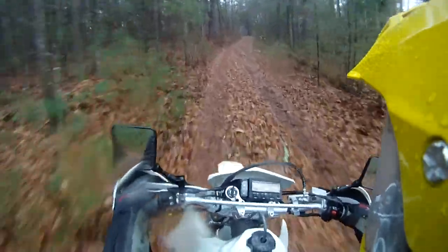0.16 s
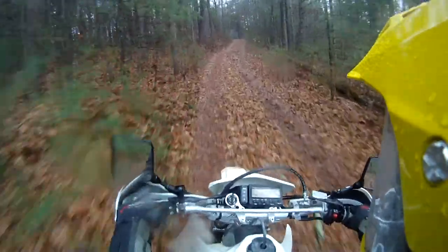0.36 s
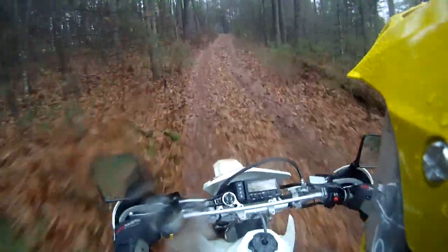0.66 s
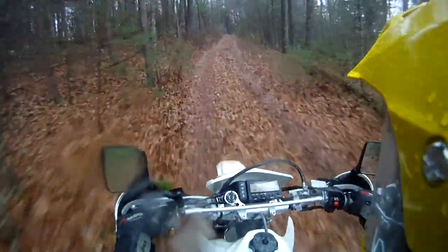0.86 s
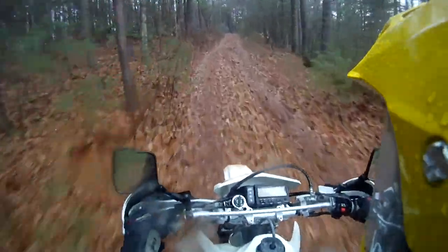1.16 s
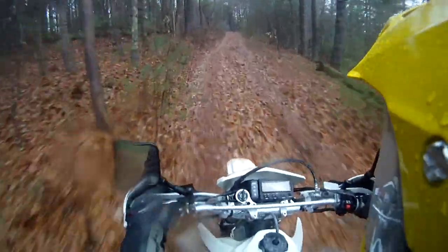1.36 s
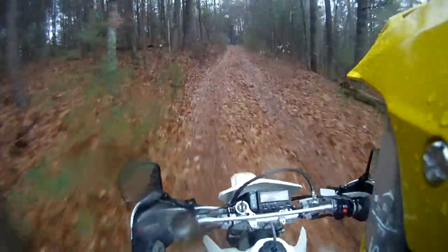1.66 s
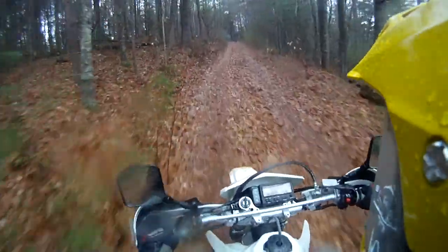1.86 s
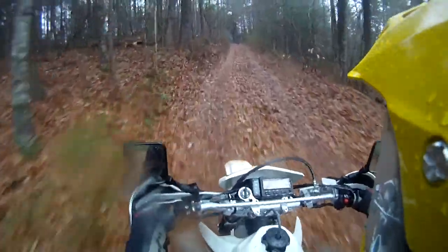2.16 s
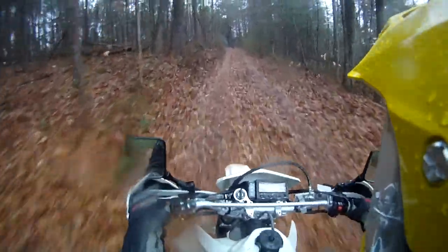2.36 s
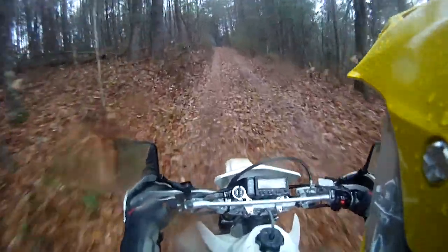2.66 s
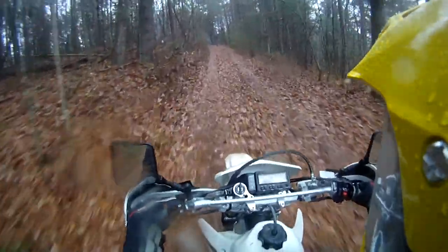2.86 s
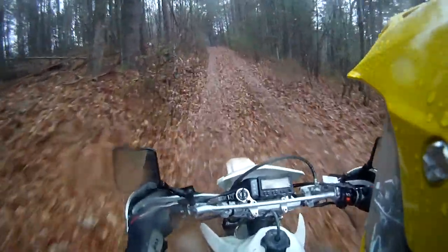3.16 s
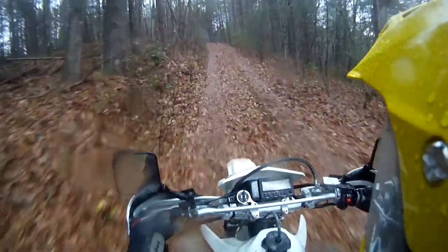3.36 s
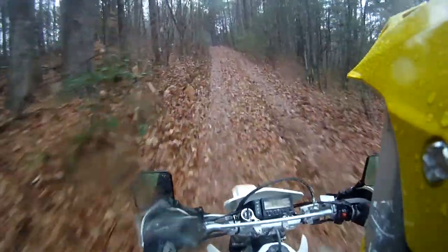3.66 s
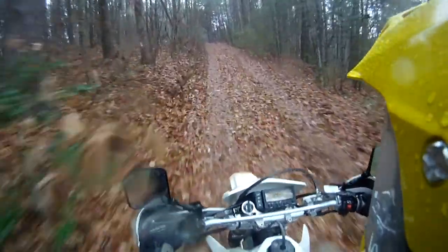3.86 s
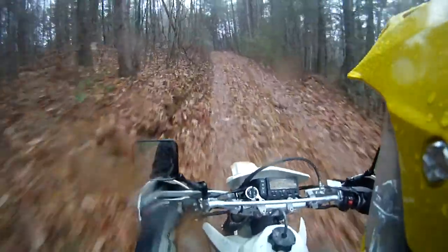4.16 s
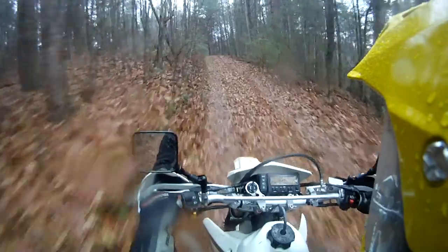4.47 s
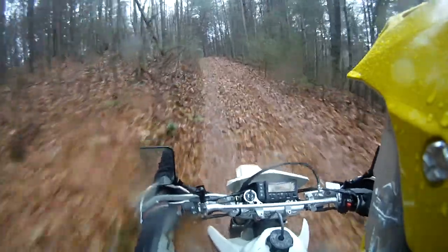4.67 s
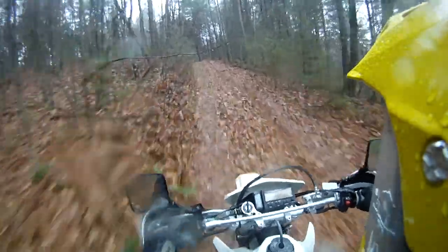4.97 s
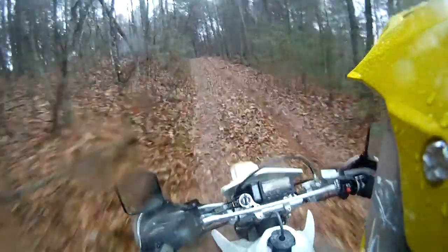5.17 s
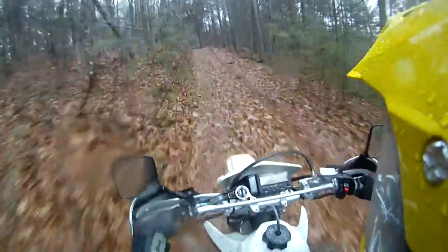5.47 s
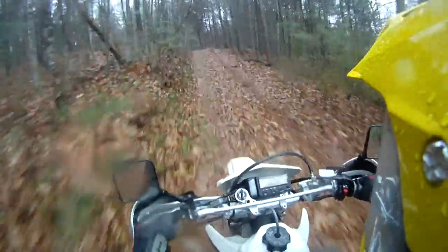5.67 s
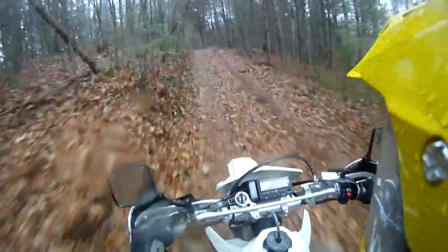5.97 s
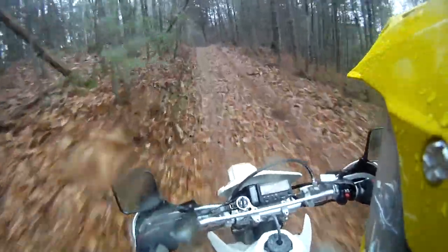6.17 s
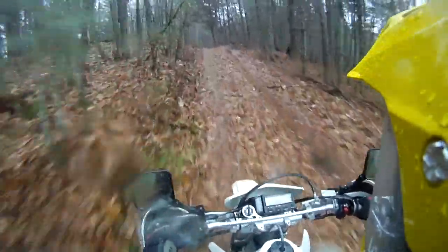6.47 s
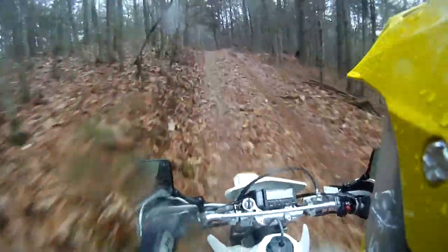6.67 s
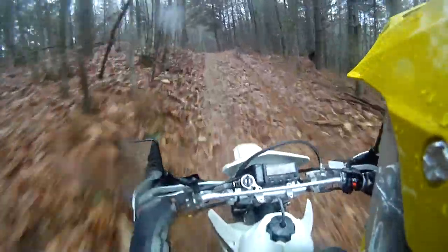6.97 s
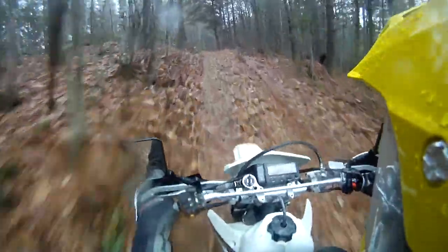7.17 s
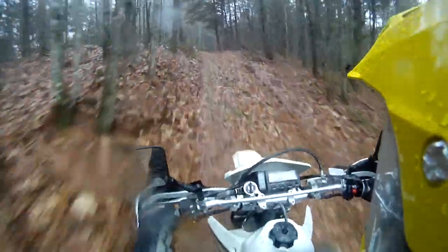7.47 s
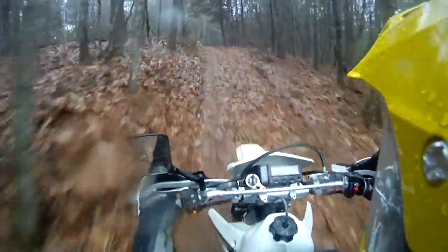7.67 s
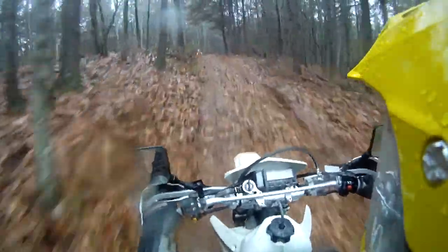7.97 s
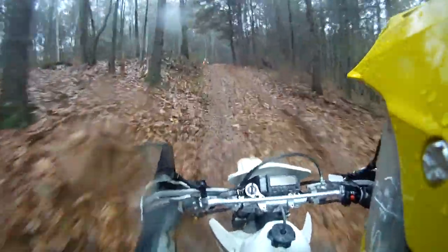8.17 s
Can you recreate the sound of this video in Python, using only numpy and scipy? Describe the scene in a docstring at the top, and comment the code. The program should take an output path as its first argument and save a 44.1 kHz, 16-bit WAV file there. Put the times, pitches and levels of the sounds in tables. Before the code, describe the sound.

Helmet-level ride on a thumping off-road motorcycle, muffled and rattly, wet tyre hiss beneath, small sharp ticks, then a hard distorted crack before pulling again.

```python
"""A single-cylinder dirt bike on a wet forest track, heard from a cased camera on the rider's helmet.
From the start: filtered firing pulses give exhaust thud and bark plus intake growl; shaped noise gives
engine clatter, a case buzz once a cycle and wet tyre hiss, all over a wobbling low helmet boom.
The engine pulls, shifts up near 1.7 s, cruises, shifts down near 3.8 s, while drops and grit tick on the case.
Easing off, it meets hard knocks near 5.2 s (struck modes) that clip and duck the sound, then pulls again."""
import sys
import numpy as np
from scipy import signal
from scipy.fft import rfft, irfft
from scipy.io import wavfile

SR = 44100
rng = np.random.default_rng(int(sys.argv[2]) if len(sys.argv) > 2 else 0)


def digitize_waveform(pressure):
    """Quantize a signal to 16-bit integers and store it at the path in sys.argv[1].

    Rows of a 2-D input are taken as channels; values are limited to [-1, 1].
    """
    field = np.atleast_2d(pressure).T
    bounded = np.clip(field, -1, 1)
    quanta = np.round(bounded * 32767).astype(np.int16)
    wavfile.write(sys.argv[1], SR, quanta)


N = 366912
T = np.arange(N) / SR


def amp(db):
    """Decibels to gain."""
    return 10 ** (np.asarray(db) / 20)


def evened(x):
    """Scales to rms 1."""
    return x / np.sqrt(np.mean(x ** 2) + 1e-20)


def peaked(x):
    """Scales to peak 1."""
    return x / abs(x).max()


def curve(rows):
    """Table columns, joined by straight lines in time."""
    t_s, *columns = np.transpose(rows)
    return [np.interp(T, t_s, column) for column in columns]


def add(mix, t_s, sound):
    """Mixes a sound in at a time, cut at the end of the mix."""
    part = mix[round(t_s * SR):][:len(sound)]
    part += sound[:len(part)]


def wander(hz):
    """Random points at a given rate, joined by lines, rms 1."""
    points = rng.standard_normal(N // 40)
    return evened(np.interp(T * hz, np.arange(N // 40), points))


def colour(x, points, peaks=(), size=8192):
    """Minimum-phase (causal) filter from a spectrum with resonances on top."""
    bin_hz = np.fft.rfftfreq(size, 1 / SR)
    f_hz, point_db = np.transpose(points)
    gain_db = np.interp(np.log(bin_hz + 1), np.log(f_hz), point_db)
    for centre_hz, width_hz, rise_db in peaks:
        gain_db = gain_db + rise_db / (1 + (2 * (bin_hz - centre_hz) / width_hz) ** 2)
    # folding the cepstrum onto positive time gives minimum phase
    cepstrum = irfft(np.log(amp(gain_db)))
    cepstrum[1:size // 2] *= 2
    cepstrum[size // 2 + 1:] = 0
    impulse = irfft(np.exp(rfft(cepstrum)))
    return signal.oaconvolve(x, impulse)[:len(x)]


# case transmission: f/Hz, level/dB
CASE_SPECTRUM = [(300, -9.5), (3600, 6), (4050, 0), (4800, 6), (5350, 4), (6000, -14), (6800, 4.5),
                 (7900, -4), (9600, -1.5), (11000, -6.5), (11500, -22.5), (12500, -32), (13300, -6.5),
                 (15400, -6.5)]
# narrow case resonances: f/Hz, width/Hz, rise/dB
CASE_RESONANCES = [(1210, 180, 4), (2330, 180, 4), (3650, 150, 3), (8350, 180, 6), (9670, 200, 8),
                   (10790, 170, 12), (13210, 160, 15), (14320, 220, 9)]


def through_case(x):
    """The case passes some bands, blocks others and resonates."""
    return colour(x, CASE_SPECTRUM, CASE_RESONANCES)


def cased(x, points):
    """A source spectrum heard through the case, rms 1."""
    return evened(through_case(colour(x, points)))


def gate(turns, at, width):
    """Gaussian bump at one point of every engine cycle; at and width in cycles."""
    return np.exp(-.5 * (((turns - at + .5) % 1 - .5) / width) ** 2)


def grains(per_s, spread_db):
    """Random tiny impacts of either sign, a few of them large, rms 1."""
    size = amp(spread_db * np.minimum(rng.exponential(1, N), 4))
    sign = rng.choice([-1, 1], N)
    return evened(size * sign * (rng.random(N) < per_s / SR))


# engine speed over pulls and gear shifts: t/s, firings/Hz
ENGINE_SPEED = [(0.0, 30.26), (0.15, 30.9), (0.7, 33.29), (0.87, 33.02), (1.5, 35.74), (1.64, 30.22),
                (1.87, 24.43), (2.15, 24.86), (2.75, 26.1), (3.0, 25.83), (3.68, 26.73), (3.88, 30.45),
                (4.15, 30.96), (4.38, 30.75), (4.53, 29.21), (4.88, 27.35), (5.13, 27.21), (6.0, 25.48),
                (6.38, 24.51), (6.5, 26.59), (6.9, 29.74), (7.2, 28.46), (7.65, 29.75), (8.32, 29.91)]


def firing_hz():
    """One firing per engine cycle."""
    return curve(ENGINE_SPEED)[0]


# unevenness 0-1 at steady speed; rate of speed change that alone gives full unevenness
STEADY_RAGGED, UPSET_HZ_PER_S = 0.026, 32


def ragged():
    """Firings turn uneven (0-1) while the engine speed changes fast."""
    change_hz_per_s = abs(np.gradient(firing_hz())) * SR
    return np.minimum(STEADY_RAGGED + (change_hz_per_s / UPSET_HZ_PER_S) ** 2, 1)


def strokes(turns, at, jitter_s):
    """One pulse a cycle; ragged running upsets its size and moment."""
    spread_db = 2.5  # std dev at full raggedness, as is jitter_s
    index = np.flatnonzero(np.diff(np.floor(turns - at)))
    late, size = rng.standard_normal((len(index), 2)).T * ragged()[index]
    place = index + (late * jitter_s * SR).astype(int)
    pulses = np.zeros(N)
    pulses[np.clip(place, 0, N - 1)] = amp(spread_db * size)
    return pulses


# exhaust thud spectrum: f/Hz, level/dB
THUD_SPECTRUM = [(30, -48), (65, -11.5), (100, 10.5), (132, 12.5), (165, -19), (220, -13), (500, -65)]
# pipe standing waves: f/Hz, width/Hz, rise/dB
PIPE_RESONANCES = [(99, 45, 7), (226, 30, 4), (277, 79, 8.5)]
# exhaust bark spectrum: f/Hz, level/dB
BARK_SPECTRUM = [(90, -34), (165, -21), (200, 8), (238, -1), (290, 8), (335, 7.5), (400, -3), (455, 3),
                 (540, -6), (700, -18.5), (1000, -19), (1500, -48)]
BARK_DB = -46  # rms at full throttle


def exhaust(turns, throttle, thud_db):
    """Blow-down pulses thud in the pipe and bark in proportion to throttle."""
    blow = strokes(turns, at=.94, jitter_s=0.002)
    thud = amp(thud_db - 3.0) * evened(colour(blow, THUD_SPECTRUM, PIPE_RESONANCES))
    bark = amp(BARK_DB) * throttle * evened(colour(blow, BARK_SPECTRUM))
    return thud + bark


# intake growl spectrum: f/Hz, level/dB
INTAKE_SPECTRUM = [(150, -30), (198, -2.5), (240, 4), (272, 7), (310, -5), (360, -17.5), (450, -9),
                   (540, -21), (700, -26), (1500, -55)]
# open-throttle rms before the throb; drop at shut throttle; throttle step that cuts the drop by 1/e
GROWL_DB, SHUT_DROP_DB, BITE = -48, 6, .15
# throb period in engine cycles; peak place 0-1; depth at shut throttle
THROB_CYCLES, THROB_PEAK, THROB_DB = 7.365, .15, 4


def airbox(turns, throttle):
    """Intake pulses growl near half a cycle from the exhaust, fade as throttle shuts and throb at light load."""
    suck = strokes(turns, at=.49, jitter_s=.002)
    throb = np.cos(2 * np.pi * (turns / THROB_CYCLES - THROB_PEAK))
    throb_db = THROB_DB * (1 - throttle) * throb
    level_db = GROWL_DB - SHUT_DROP_DB * np.exp(-throttle / BITE) + throb_db
    return amp(level_db) * evened(colour(suck, INTAKE_SPECTRUM, [(275, 40, 2.4)]))


# engine clatter spectrum: f/Hz, level/dB
CLATTER_SPECTRUM = [(150, -25.5), (400, -22), (550, -4.5), (800, -6.5), (890, -11), (1000, 0), (1230, -1),
                    (1400, -11), (1650, -16), (2100, -12), (2450, -14.5), (3000, -28), (6000, -29),
                    (15000, -20)]


def clatter(turns, level_db):
    """Piston, chain and gears tap the crankcase, harder as the valves shut."""
    load = 1 + 0.77 * gate(turns, at=0.33, width=0.09) + 0.27 * gate(turns, at=0.83, width=0.047)
    taps = grains(per_s=5000, spread_db=1.5) * load * amp(1.0 * wander(hz=25.13))
    return amp(level_db + 1.0) * cased(taps, CLATTER_SPECTRUM)


# case buzz spectrum: f/Hz, level/dB
BUZZ_SPECTRUM = [(400, -6), (900, -18), (1220, 4.5), (1500, -21.5), (1850, -5), (2100, -3), (2200, -15),
                 (2340, 2), (2800, -15), (4500, -19), (8300, -21), (9700, -11.5), (11500, -26.5),
                 (14400, -12)]


def buzz(turns, level_db, rise_s=0.0015, hold_s=0.0056, decay_s=.0045):
    """The case bumps its mount at the peak of every shake and chatters briefly."""
    since_s = (turns - .255) % 1 / firing_hz()
    burst = (1 - np.exp(-since_s / rise_s)) * np.exp(-np.maximum(since_s - hold_s, 0) / decay_s)
    chatter = rng.standard_normal(N) * burst * amp(.6 * wander(hz=22))
    return amp(level_db + 1.5) * cased(chatter, BUZZ_SPECTRUM)


# tyre hiss spectrum: f/Hz, level/dB
HISS_SPECTRUM = [(200, -6), (700, 7.5), (1500, 3.5), (2600, -1), (3500, -5.5), (5000, -5), (9000, -6),
                 (15000, -17.5)]


def tyres(turns, level_db):
    """Wet leaves and spray crackle under the tyres; the valves add a thin tick."""
    spray = grains(per_s=6000, spread_db=3.0) * amp(0.58 * wander(hz=30.44))
    valves = 0.8 * rng.standard_normal(N) * gate(turns, at=0.682, width=0.02)
    return amp(level_db + 2.5) * cased(spray + valves, HISS_SPECTRUM)


# buffeting air spectrum: f/Hz, level/dB
WIND_SPECTRUM = [(10, -24.5), (25, 1), (48, -4.5), (80, -9.5), (150, -15), (280, -15), (420, -22),
                 (1000, -41)]
# bumps and gusts that swell the boom: t/s, length/s, level/dB
BOOM_JOLTS = [(0.0, 0.04, -29.5), (0.41, 0.065, -40), (0.68, .13, -43), (0.987, 0.084, -34),
              (1.422, .1, -35.5), (2.55, 0.42, -34.5), (3.103, 0.16, -41), (4.132, 0.15, -31),
              (4.45, 0.058, -34), (4.794, 0.047, -37.5), (5.22, 0.12, -16.5), (5.677, 0.54, -35.5),
              (7.94, 0.2, -27.5)]
BOOM_HZ, BOOM_WAVER_HZ = 32.2, 0.705  # centre, rms waver
# level of each of two random parts at rest; swell rise; ring-out
BOOM_REST_DB, BOOM_RISE_S, BOOM_FALL_DB_PER_S = -43, 0.03, 55


def helmet():
    """The helmet booms at one low pitch, stirred by buffeting air; each jolt swells it, then it rings out."""
    swell = amp(BOOM_REST_DB) * (wander(hz=10) + 1j * wander(hz=7.2))
    for t_s, length_s, level_db in BOOM_JOLTS:
        since_s = np.maximum(T - t_s, 0)
        fall_db = BOOM_FALL_DB_PER_S * np.maximum(since_s - length_s, 0)
        swell = swell + (1 - np.exp(-since_s / BOOM_RISE_S)) * amp(level_db - fall_db)
    pitch_hz = BOOM_HZ + BOOM_WAVER_HZ * wander(hz=6)
    carrier = np.exp(2j * np.pi * np.cumsum(pitch_hz) / SR)
    boom = np.sqrt(2) * (swell * carrier).real
    air = evened(colour(rng.standard_normal(N), WIND_SPECTRUM)) * amp(2.3 * wander(hz=5.8))
    return boom + amp(-48) * air


def contact(decay_s, strike=3, size=4096):
    """A sharp strike followed by a brief scrape."""
    scrape = rng.standard_normal(size) * np.exp(-np.arange(size) / SR / decay_s)
    scrape[0] += strike
    return scrape


# mean peak before the tick trim, its std dev; median pitch
SMALL_TICK_DB, SMALL_TICK_SPREAD_DB, SMALL_TICK_HZ = -33, 2, 2350


def small_ticks(count):
    """Faint drops at random moments: rows of t/s, peak/dB before trim, f/Hz."""
    rows = []
    for _ in range(count):
        t_s = rng.uniform(0, T[-1])
        peak_db = SMALL_TICK_DB + SMALL_TICK_SPREAD_DB * rng.standard_normal()
        pitch_hz = SMALL_TICK_HZ * np.exp(.1 * rng.standard_normal())
        rows.append((t_s, peak_db, pitch_hz))
    return rows


# impact spectrum, for ticks and knocks: f/Hz, level/dB
CRACK_SPECTRUM = [(200, 6.5), (1200, 9.5), (2200, 6.5), (3500, 7.5), (5500, 7), (9000, 8.5), (15000, -11)]
# larger drops and grit: t/s, peak level/dB before trim, f/Hz
LARGE_TICKS = [(0.9353, -25.5, 2500), (1.219, -30, 1890), (1.478, -31, 2090), (1.73, -31.5, 2520),
               (1.889, -27.5, 2690), (2.1185, -29, 3250), (2.139, -25, 2380), (3.7736, -26, 1850),
               (3.8758, -23.5, 2000), (4.191, -23, 2340), (4.2543, -25, 2450), (4.6526, -18, 2420),
               (4.8016, -28.5, 1910), (4.9316, -24, 1960), (6.084, -31.5, 2450), (6.2577, -22.5, 2320),
               (6.768, -24.5, 3790), (7.2203, -27.5, 2550), (7.9656, -29, 2400), (8.2142, -27, 2630)]
TICK_TRIM_DB = 2.5


def ticks():
    """Drops and grit crack on the case and ring it lightly, each spot at its own pitch."""
    out = np.zeros(N)
    for t_s, peak_db, pitch_hz in LARGE_TICKS + small_ticks(count=9):
        hit = colour(contact(decay_s=0.0024), CRACK_SPECTRUM, [(pitch_hz, 1400, 8)])
        add(out, t_s, amp(peak_db + TICK_TRIM_DB) * peaked(through_case(hit)))
    return out


def struck(hit, modes):
    """Decaying modes driven by a contact, peak 1."""
    t = T[:len(hit)]
    ring = sum(amp(db - 60 * t / t60_s) * np.sin(2 * np.pi * hz * t) for hz, db, t60_s in modes)
    return peaked(signal.fftconvolve(hit, ring)[:len(hit)])


# struck case modes: f/Hz, level/dB, t60/s
CASE_RING = [(70.4, -29.5, 0.19), (221, -20.5, 0.049), (560, -19.5, 0.016), (815, -2.5, 0.024),
             (1206, -0.5, 0.042), (1460, -1, 0.02), (1490, -19.5, 0.014), (2030, 1, 0.024),
             (2320, 0, 0.021), (2330, -2, 0.018), (2940, -4.5, 0.014), (3580, -12.5, 0.035),
             (8300, -4, 0.032), (10960, -3.5, 0.042), (13400, -7, 0.042)]
# helmet shell modes: f/Hz, level/dB, t60/s
SHELL_RING = [(72.4, 11.5, 0.16), (200, -20.5, 0.031), (465, -6, 0.054)]
# blows on the case, then two drops ticking on it at 5.36 and 5.39 s: t/s, peak level/dB without thump, contact
# decay/s, low-pass f/Hz, thump rel. level/dB
CASE_KNOCKS = [(5.185, -21, 0.0055, 1500, -30), (5.2039, -10, 0.014, 3000, -32.5),
               (5.2137, 14, 0.0033, 3920, -36.5), (5.2153, 23.5, 0.0017, 1610, -26.5),
               (5.2387, 9, 0.0033, 5830, -45), (5.2418, 5.5, 0.002, 5130, -33),
               (5.3614, -12, 0.00069, 8900, -34), (5.3893, -19.5, 0.0011, 9100, -35),
               (5.7601, -12.5, 0.0032, 805, -14.5)]


def knocks():
    """Blows, and two drops after them, ring the case and thump the shell; softer contact leaves out the treble."""
    out = np.zeros(N)
    for t_s, peak_db, decay_s, bright_hz, shell_db in CASE_KNOCKS:
        hit = contact(decay_s, strike=7.3)
        knock = struck(hit, CASE_RING) + 1.58 * peaked(cased(hit, CRACK_SPECTRUM))
        pole = np.exp(-2 * np.pi * bright_hz / SR)
        knock = peaked(signal.lfilter([1], [1, -pole], knock))
        thump = amp(shell_db) * struck(signal.unit_impulse(len(hit)), SHELL_RING)
        add(out, t_s, amp(peak_db) * (knock + thump))
    return out


# ride, levels before each source's trim: t/s, throttle/0-1, thud level/dB, clatter level/dB,
# hiss level/dB, buzz level/dB
RIDE_COURSE = [(0.0, 0.6, -50, -44.5, -50.5, -52.5), (0.6, 0.85, -50, -44.5, -48.5, -58),
               (1.48, 1, -48.5, -42.5, -48, -48.5), (1.66, 0.3, -46, -48.5, -52, -62),
               (1.9, 0, -51.5, -48, -53, -50), (2.2, .25, -47, -44.5, -53, -51.5),
               (2.75, 0.54, -45, -46.5, -52.5, -47), (3.68, 0.44, -46, -43.5, -51, -49.5),
               (3.87, .8, -58, -43.5, -47, -47), (4.26, 0.84, -59, -44.5, -46, -45.5),
               (4.42, 0.1, -48, -45.5, -49, -58.5), (4.95, 0.07, -48, -48.5, -50, -50.5),
               (5.5, .2, -49, -47, -50.5, -59.5), (6.1, 0.32, -51.5, -47, -52.5, -49),
               (6.5, 0.33, -48, -46.5, -51.5, -49.5), (6.85, 0.5, -53, -48.5, -45, -46.5),
               (7.15, 0.6, -48, -48.5, -48.5, -47), (7.7, 0.9, -59, -47, -46, -45),
               (8.32, 0.64, -53, -48.5, -47.5, -48)]


def scene():
    """Engine cycles time the exhaust, intake, clatter, buzz and valve tick; the rest is added."""
    turns = np.cumsum(firing_hz()) / SR
    throttle, thud_db, clatter_db, hiss_db, buzz_db = curve(RIDE_COURSE)
    throttle = np.clip(throttle, 0, 1)
    engine = exhaust(turns, throttle, thud_db) + airbox(turns, throttle)
    engine = engine + clatter(turns, clatter_db) + buzz(turns, buzz_db)
    return (engine + tyres(turns, hiss_db) + helmet() + ticks() + knocks())[None]


EDGE_HZ = 15400


def record(dry, threshold_db=-5, recover_db_per_s=110, attack_s=0.021):
    """Gain control comes too late for a hard knock, which clips; then the band limit."""
    over_db = np.maximum(20 * np.log10(abs(dry[0]) + 1e-9) - threshold_db, 0)
    fall_db = T * recover_db_per_s
    held_db = np.maximum.accumulate(over_db + fall_db) - fall_db
    lag = np.exp(-1 / (attack_s * SR))
    duck_db = signal.lfilter([1 - lag], [1, -lag], held_db)
    clipped = np.clip(dry / amp(duck_db), -.88, .88)
    low_pass = signal.firwin(401, EDGE_HZ, window=("kaiser", 8), fs=SR)
    return signal.oaconvolve(clipped, low_pass[None], "same")


dry = scene()
out = record(dry)
digitize_waveform(out)
```